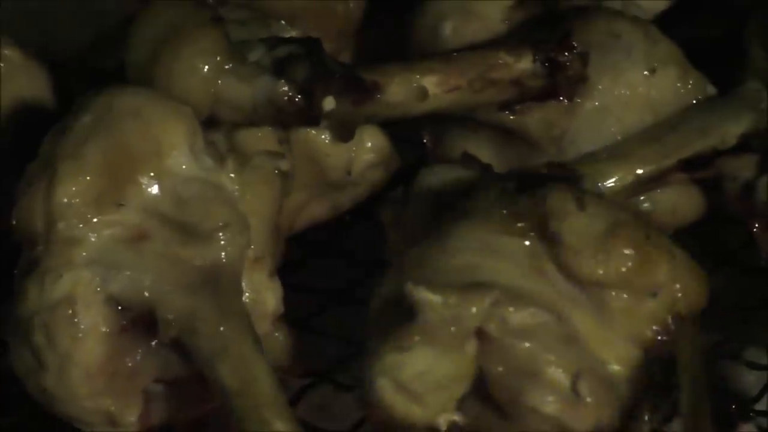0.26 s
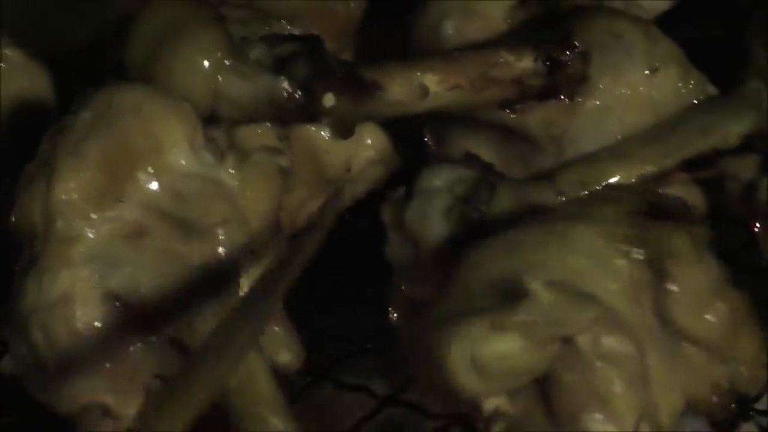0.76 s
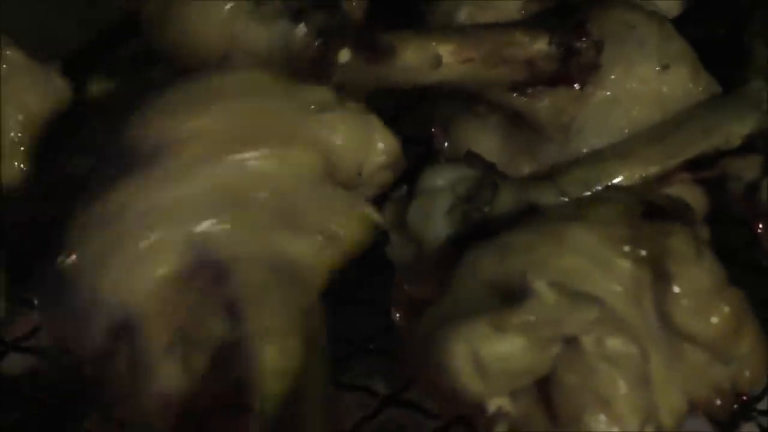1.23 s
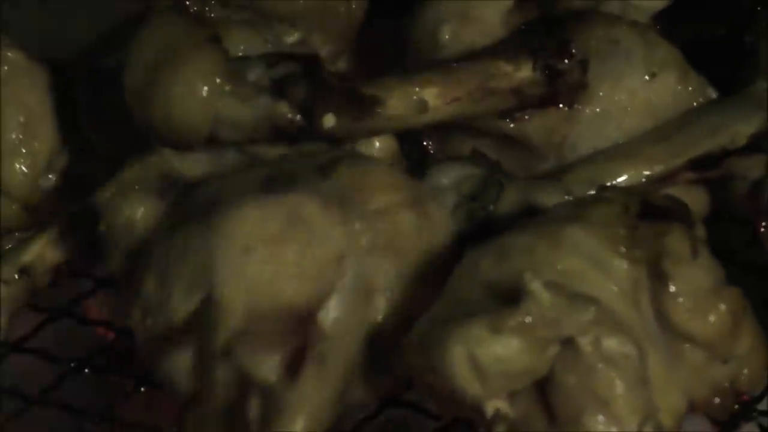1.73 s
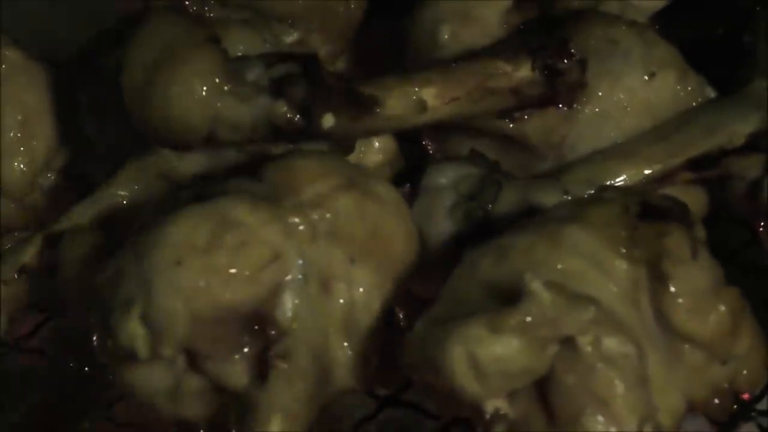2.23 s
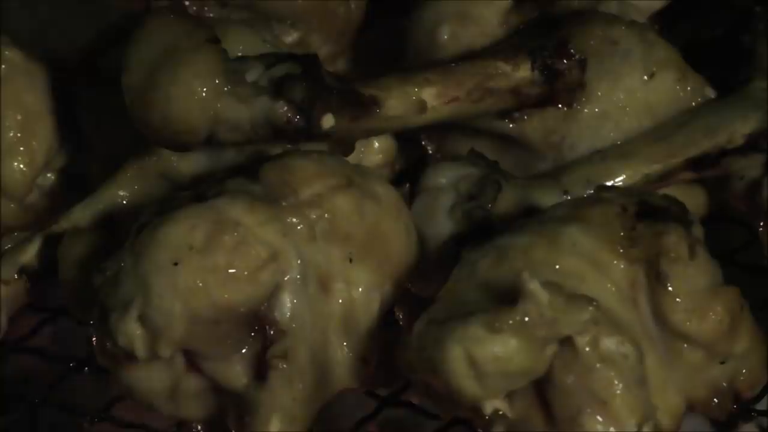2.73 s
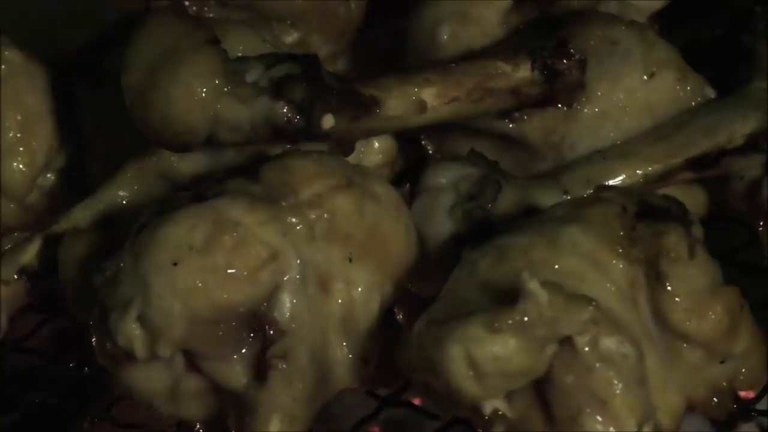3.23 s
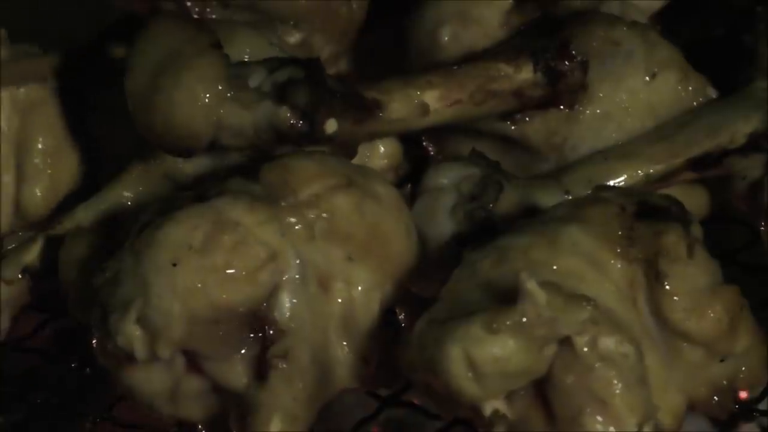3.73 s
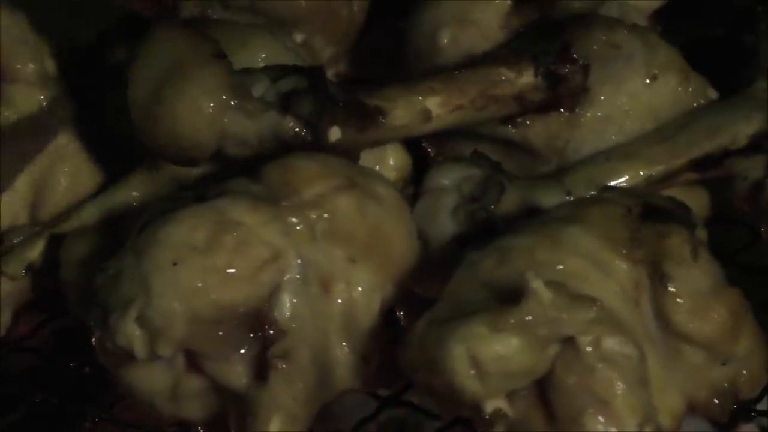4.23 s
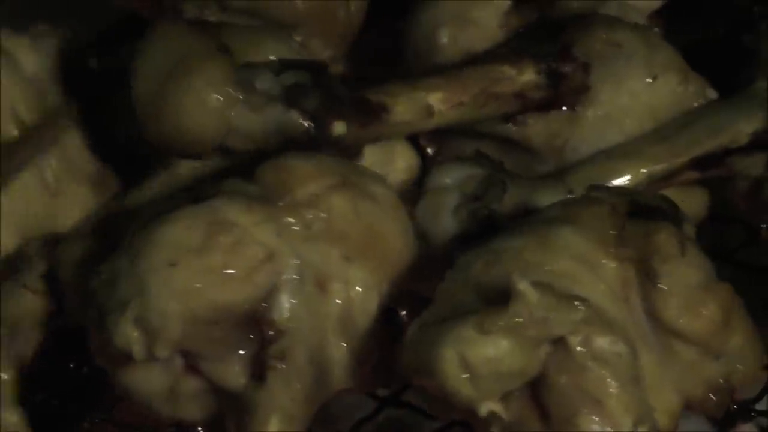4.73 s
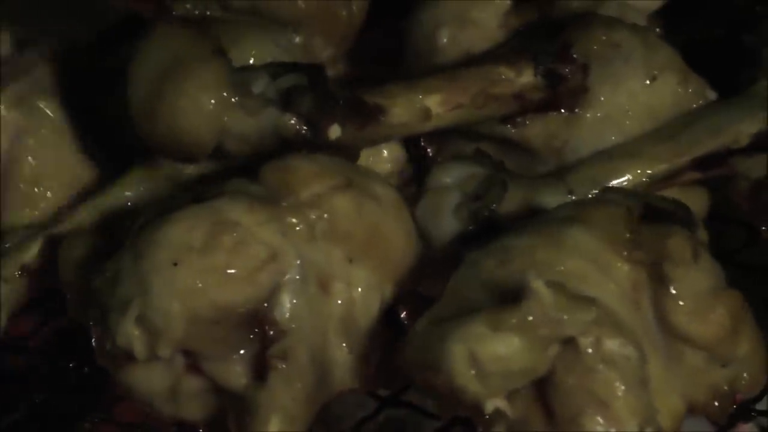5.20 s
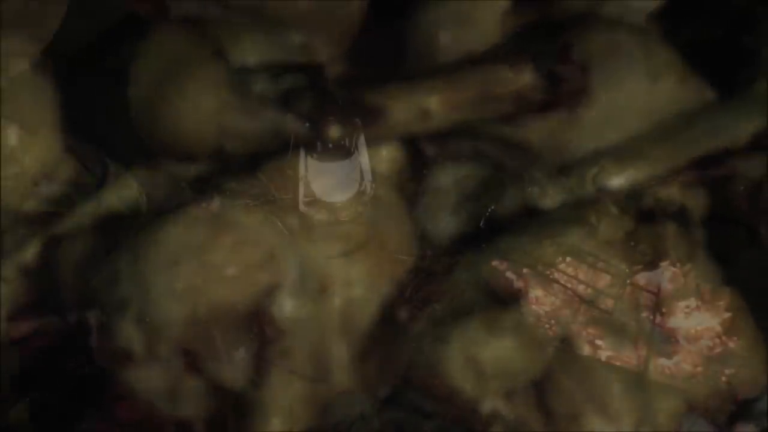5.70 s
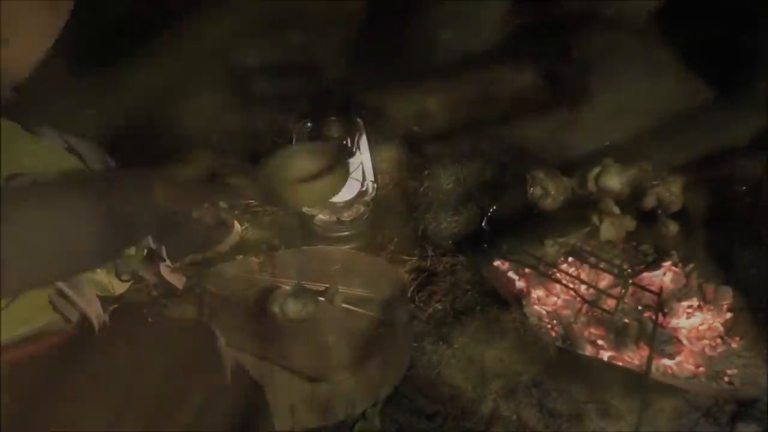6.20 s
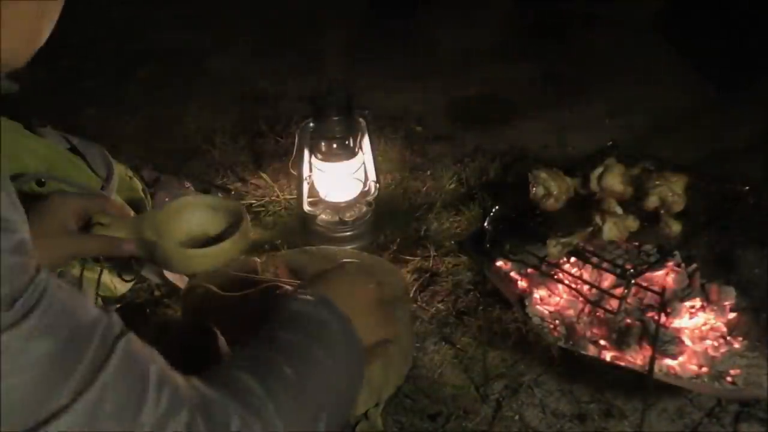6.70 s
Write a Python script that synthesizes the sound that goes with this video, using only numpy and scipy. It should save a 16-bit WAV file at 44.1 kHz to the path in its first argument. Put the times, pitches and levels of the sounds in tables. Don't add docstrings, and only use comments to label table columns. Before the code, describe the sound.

A close, nearly mono microphone hears chicken sizzling on a charcoal grate outdoors, a fine bright fizz over a very faint low draught, coloured by a short ground reflection. A loud crack at 0.4 s starts a spitting burst; from 0.55 to 1.05 s pops crowd together and a steam jet hisses strongly. The sizzle then runs smoothly until a crackly, fading spit at 2.2-2.6 s. Soft steam swells follow around 3-3.5 s, a hard snap at 3.8 s, then a quieter simmer. From 4.6 to 5.2 s fat spits busily, with strong cracks near 5.0 and 5.25 s. At 5.5 s the sound abruptly widens: louder low wind thumps the microphone while sizzling continues. A sharp spit comes at 5.8 s, a tiny falling high squeak of steam with faint grass-like rustle at 6.1-6.2 s, then swelling steam and bright scattered pops until 6.95 s.

```python
import sys
import numpy as np
from scipy import signal
from scipy.fft import rfft, irfft, next_fast_len
from scipy.io import wavfile
from scipy.ndimage import uniform_filter1d

SR = 44100
rng = np.random.default_rng(int(sys.argv[2]) if len(sys.argv) > 2 else 0)


def store_pcm(level_fs):
    pcm = np.round(np.clip(level_fs, -1, 1) * 32767).astype(np.int16)
    wavfile.write(sys.argv[1], SR, np.atleast_2d(pcm).T)


def amplitude_ratio(level_db):
    exponent = np.asarray(level_db, float) / 20
    return 10 ** exponent


N = 306476
T = np.arange(N) / SR
HZ = np.fft.rfftfreq(next_fast_len(N), 1 / SR)
CUT_S = 5.484
ECHO_S, ECHO_SHARE, ECHO_TOP_HZ = 0.002861, 0.54, 5100


def evened(x):
    return x / np.sqrt(np.mean(x ** 2) + 1e-20)


def read(points, hz):
    f, value = np.transpose(points)
    return np.interp(np.log(hz + 1), np.log(f + 1), value)


def add(mix, s, sound):
    part = mix[round(s * SR):][:len(sound)]
    part += sound[:len(part)]


def filtered(x, gain):
    size = next_fast_len(N)
    return irfft(rfft(x, size) * gain, size)[..., :N]


def closed(points):
    return amplitude_ratio(read(points, HZ)) * (HZ > points[0][0]) * (HZ < points[-1][0])


def ground(share):
    dullness = 1 + (HZ / ECHO_TOP_HZ) ** 2
    return 1 + share * np.exp(-2j * np.pi * HZ * ECHO_S) / dullness


def flicker(width_s):
    size = max(2, round(width_s * SR))
    smooth = uniform_filter1d(rng.standard_normal(N), size)
    return evened(uniform_filter1d(smooth, size))


def bubbles(per_s, spread_db):
    excess = np.minimum(rng.exponential(1, N), 3)
    size = amplitude_ratio(spread_db * excess) * rng.choice([-1., 1.], N)
    return size * (rng.random(N) < per_s / SR)


def resonate(x, hz, width):
    turn = np.exp(2j * np.pi * np.cumsum(hz * np.ones(len(x))) / SR)
    r = np.exp(-np.pi * width / SR)
    smooth = signal.lfilter([1], [1, -2 * r, r * r], x / turn)
    return evened((turn * smooth).real)


def patchy(x, patch_db, frames, bins):
    z = signal.stft(x, nperseg=512, noverlap=384)[2]
    field = rng.standard_normal(z.shape[-2:])
    field = uniform_filter1d(field, size=round(bins), axis=0)
    field = uniform_filter1d(field, size=round(frames), axis=1)
    return signal.istft(z * amplitude_ratio(patch_db * evened(field)), nperseg=512, noverlap=384)[1][..., :N]


# (frequency [Hz], correlation [0-1])
NEAR_LIKENESS = [(60, 0.97), (380, 0.98), (2380, 0.99), (15000, 1.0)]
WIDE_LIKENESS = [(60, 0.85), (180, 0.84), (550, 0.98), (1650, 0.95), (4970, 0.75), (15000, 0.93)]
# (frequency [Hz], left minus right [dB])
WIDE_BALANCE = [(60, 0.5), (380, 0.5), (2380, 2), (15000, -3)]


def spread(points, patchy_db, patch_s, near_echo=0.):
    a, b = rng.standard_normal((2, N))
    views = []
    near = (NEAR_LIKENESS, 0 * HZ, near_echo)
    wide = (WIDE_LIKENESS, read(WIDE_BALANCE, HZ), 0.24 * near_echo)
    for likeness, left_db, echo in (near, wide):
        c = np.clip(read(likeness, HZ), 0, 1)
        mid, side = np.sqrt((1 + c) / 2), np.sqrt((1 - c) / 2)
        colour = closed(points) * ground(echo) * amplitude_ratio(np.array([left_db, -left_db]) / 2)
        shared = filtered(a, colour * mid)
        opposed = filtered(b, colour * side) * [[1], [-1]]
        views.append(evened(shared + opposed))
    return np.where(T < CUT_S, *views) * amplitude_ratio(patchy_db * flicker(patch_s))


# (frequency [Hz], density [dB per Hz])
DRAUGHT_COLOUR = [(12, -39), (25, -19.5), (91, -2.5), (205, 2), (380, -8.5), (480, -9.5), (590, -16.5),
                  (760, -15.5), (900, -39)]
# (frequency [Hz], density [dB per Hz])
WIND_COLOUR = [(12, -47), (20, -12.5), (75, 1.5), (123, -0.5), (176, -10.5), (375, -9.5), (602, -20.5),
               (675, -14), (835, -22), (1000, -15.5), (1300, -19), (2200, -120)]
# (time [s], level [dB], frequency [Hz])
GUST_THUMPS = [
    (5.488, -32.5, 71.6),
    (5.535, -32, 77),
    (5.806, -30, 95),
]


def air(gain):
    near = spread(DRAUGHT_COLOUR, patchy_db=1.94, patch_s=0.058, near_echo=.5 * ECHO_SHARE)
    hollow_db = -11.5 - 0.9 * T + 2.8 * flicker(0.07)
    near += amplitude_ratio(hollow_db) * resonate(rng.standard_normal(N), hz=739, width=56)
    wind = spread(WIND_COLOUR, patchy_db=1.5, patch_s=0.025)
    thumps, t = np.zeros(N), np.arange(4000) / SR
    for s, db, hz in GUST_THUMPS:
        add(thumps, s, -np.sin(2 * np.pi * hz * t) * amplitude_ratio(db - 60 * t / 0.051))
    return gain * np.where(T < CUT_S, near, wind) + thumps


# (frequency [Hz], density [dB per Hz])
STEAM_COLOUR = [(600, -45), (900, -7), (1100, -1), (1400, 0.5), (2000, -2.5), (2600, -5.5), (3200, -13)]


def steam(gain):
    hiss = spread(STEAM_COLOUR, patchy_db=.8, patch_s=.03, near_echo=ECHO_SHARE)
    return gain * patchy(hiss, patch_db=1.27, frames=27, bins=4)


# (frequency [Hz], density [dB per Hz])
VENT_COLOUR = [(1290, -43), (2200, -8), (2630, -0.5), (3480, 1.5), (4750, -3.5), (5600, -3), (7280, -10.5),
               (12300, -120)]
# (time [s], level [dB], pocket resonance [Hz])
STEAM_JETS = [
    [(0.56, -45, 3290), (0.754, -43.5, 3308), (0.86, -55, 3298)],
    [(4.64, -64, 3482), (4.7, -55.5, 3493), (4.826, -59.5, 3460), (4.95, -63, 3540), (5.078, -58, 3540),
     (5.24, -72, 3460)],
]
# (time [s], level [dB], pocket resonance [Hz])
STEAM_PUFFS = [
    [(.1, -68, 1350), (.3, -61, 1430), (.55, -56, 1420)],
    [(2.84, -69, 1360), (2.95, -61, 1320), (3.08, -69, 1340)],
    [(6.2, -66, 1390), (6.45, -54.5, 1370), (6.85, -56, 1310)],
]
# (bandwidth [Hz], second resonance [ratio], its level [dB])
SKIN_POCKETS = [
    (900, 2.23, -4),
    (400, 1.74, 1),
    (246, 1.425, -1),
    (297, 0.89, -7),
    (348, 0.84, 1),
]


def vent(gain):
    seep = spread(VENT_COLOUR, patchy_db=1.8, patch_s=0.013, near_echo=ECHO_SHARE)
    out = gain * amplitude_ratio(1.2) * patchy(seep, patch_db=1.5, frames=50, bins=6)
    sputter = rng.standard_normal(N) + 1.8 * evened(bubbles(per_s=1100, spread_db=5.0))
    for rows, (width_hz, upper, upper_db) in zip(STEAM_JETS + STEAM_PUFFS, SKIN_POCKETS):
        s, db, hz = np.transpose(rows)
        on = slice(round(s[0] * SR), round(s[-1] * SR))
        hz = np.interp(T[on], s, hz)
        rings = resonate(sputter[on], hz, width_hz)
        rings = rings + amplitude_ratio(upper_db) * resonate(sputter[on], upper * hz, width_hz)
        out[:, on] += amplitude_ratio(np.interp(T[on], s, db)) * rings * signal.windows.tukey(len(hz), .1)
    return out


# (time [s], frequency [Hz], level [dB])
SLIT_WHISTLES = [
    [(6.097, 9101, -66), (6.105, 8885, -54), (6.113, 8660, -47), (6.118, 8400, -56)],
    [(6.114, 7950, -57), (6.123, 7960, -46), (6.139, 7900, -59), (6.165, 7800, -54), (6.185, 7420, -51)],
    [(6.214, 6500, -62), (6.222, 6600, -52), (6.232, 6500, -65)],
]


def squeak():
    out = np.zeros(N)
    for rows in SLIT_WHISTLES:
        s, hz, db = np.transpose(rows)
        t = np.arange(s[0], s[-1], 1 / SR)
        phase = 2 * np.pi * np.cumsum(np.interp(t, s, hz)) / SR
        tone = np.sin(phase) * amplitude_ratio(np.interp(t, s, db))
        add(out, s[0], np.sqrt(2) * tone * signal.windows.tukey(len(t), .3))
    return out


# (time [s], peak [dB], thud relative to crack [dB],
# length [ms], crack centre [Hz])
LARGE_BURSTS = [(0.3753, -14.5, -8.5, 0.68, 7360), (.378, -26, -13, 4.8, 9500), (.676, -19, -4.5, 1.7, 8800),
                (.724, -18.5, -19, 0.75, 11800), (0.7313, -29, -9, 1.6, 10000),
                (0.774, -23.5, -15, 0.46, 10800), (0.892, -27, -11, 1.3, 12300),
                (1.0095, -26.5, -6, 0.87, 12000), (1.0335, -22.5, -23, 3.1, 7500),
                (1.2416, -33, -14, .5, 10900), (2.2296, -26, -20, 1.7, 10200),
                (2.437, -28, -13.5, 0.93, 8400), (2.5553, -28.5, -18, .7, 8300),
                (2.653, -28.5, -19, 2.8, 8700), (3.084, -27, -24, 1.1, 10300), (3.789, -12.5, -16, 1, 9700),
                (3.798, -24, -24, 1.1, 9500), (4.183, -31, -16.5, 0.4, 9300), (4.471, -28, -21, 0.36, 10900),
                (4.911, -21.5, -22, 0.32, 8640), (4.997, -28, -8, 3.5, 10400),
                (5.018, -14.5, -27, .25, 11400), (5.2516, -13.5, -42, 1.12, 10200),
                (5.789, -16, -15, 0.2, 11000),
    (5.8161, -27.5, -11, 6, 10500),
    (6.1502, -18.5, -13.5, 0.34, 10200),
    (6.3935, -21.5, -16, 0.29, 10300),
    (6.5507, -23, -28, 2.1, 12200),
    (6.7158, -16.5, -10.5, 0.59, 12800),
    (6.7236, -28.5, -26, 2.8, 12100),
]
# (time [s], peak [dB])
SMALL_BURSTS = [(.242, -31.5), (.689, -21), (.84, -25), (0.9203, -25), (0.986, -26), (1.0267, -31),
                (1.8517, -32), (2.0702, -31.5), (2.2333, -25), (2.287, -27), (2.3354, -34), (2.3885, -27.5),
                (2.474, -26), (2.517, -32), (2.578, -29.5), (3.1518, -33.5), (3.23, -35), (3.2891, -32),
                (3.3601, -37), (3.8144, -27), (4.462, -36), (4.4801, -31), (4.6584, -27), (4.7043, -20.5),
                (4.7515, -23), (4.7817, -25), (4.819, -25), (4.9686, -34), (5.0362, -21), (5.111, -27.5),
                (5.139, -30), (5.2091, -33), (5.2745, -32), (5.3532, -34), (5.5332, -31),
                     (5.8041, -22), (5.8596, -31.5), (5.9513, -33), (5.973, -35), (6.0728, -29),
                     (6.2858, -30), (6.32, -26.5), (6.474, -22.5), (6.4936, -30), (6.5285, -26),
                     (6.5798, -28), (6.681, -30.5), (6.765, -30), (6.8008, -34), (6.8286, -24),
                     (6.8503, -26), (6.9266, -44)]


def pops():
    leak_s, leak_db = .003, -25.5
    left, right, t = np.zeros(N), np.zeros(N), np.arange(1500) / SR - leak_s
    ticks = SMALL_BURSTS
    rows = [(*row, -2.5) for row in LARGE_BURSTS]
    for (s, db), (u, v) in zip(ticks, rng.standard_normal((len(ticks), 2))):
        crack_hz = 10300 * np.exp(0.15 * np.clip(u, -2, 2))
        rows.append((s, db, -22.5, 0.48, crack_hz, 3.5 * v))
    noise = rng.standard_normal((len(rows), 4, 1500))
    low = signal.butter(4, [1800, 4100], "band", fs=SR)
    for (s, db, thud_db, ms, hz, pan_db), (a, b, c, d) in zip(rows, noise):
        high = signal.butter(2, [0.67 * hz, 1.494 * hz], "band", fs=SR)
        burst = np.exp(-(t / (max(ms, .2) / 1000)) ** 2 * 0.43) * (t >= 0)
        crack = signal.lfilter(*high, a * burst * amplitude_ratio(2.5 * d))
        spray_gain = amplitude_ratio(np.where(t < 0, leak_db, -19 - 60 * t / 0.046))
        spray = signal.lfilter(*high, b * amplitude_ratio(3.15 * d) * spray_gain)
        bright = crack / abs(crack).max() + spray
        thud_tail = amplitude_ratio(np.where(t < 0, leak_db, -19 - 60 * t / 0.018))
        thud = signal.lfilter(*low, c * (burst + thud_tail))
        sound = amplitude_ratio(db) * (bright / abs(bright).max() + amplitude_ratio(thud_db) * thud / abs(thud).max())
        pan_db = pan_db * (s > 6.05)
        add(left, s - leak_s - .0001, sound * amplitude_ratio(pan_db / 2))
        add(right, s - leak_s - .0001, sound * amplitude_ratio(-pan_db / 2))
    return filtered(np.array([left, right]), ground(0.17))


# (frequency [Hz], density [dB per Hz])
FIZZ_COLOUR = [(2650, -46), (4500, -9), (5850, -10.5), (7410, 0), (8190, -2), (10800, 4.5), (15100, -3),
               (15800, -2)]
# (frequency [Hz], density [dB per Hz])
SPIT_COLOUR = [(2820, -53), (4800, -14.5), (5330, -31), (5860, -3.5), (6770, -4), (7940, -3), (9090, -3),
               (11800, -4.5), (15800, -8.5)]


def fizz(gain, share):
    hiss = evened(filtered(rng.standard_normal(N), closed(FIZZ_COLOUR))) * amplitude_ratio(1.0 * flicker(0.005))
    hiss = patchy(hiss, patch_db=1.75, frames=50, bins=12)
    spit_colour = closed(SPIT_COLOUR)
    spit = evened(filtered(rng.standard_normal(N), spit_colour)) * amplitude_ratio(0.89 * flicker(0.0043))
    grains = np.zeros(N)
    for hz in np.geomspace(7000, 14000, num=4):
        band = np.exp(-(np.log((HZ + 1) / hz) / 0.95) ** 2)
        grains += evened(filtered(bubbles(per_s=200, spread_db=13.0), spit_colour * band)) / 2
    clicks = .65 * spit + .8 * grains
    return gain * (np.sqrt(1 - share) * hiss + np.sqrt(share) * clicks)


def curve(rows):
    return amplitude_ratio(2 * np.interp(T, *np.transpose(rows)))


# (middle [s], half length [s], level [dB], vent relative to it [dB])
STEAM_SWELLS = [(0.112, 0.14, -60, -18), (0.387, .14, -58.5, -3), (0.603, 0.049, -50, -14),
                (0.697, .05, -50.5, -12), (0.767, 0.033, -52, -8), (0.894, 0.082, -61.5, 0),
                (1.053, 0.11, -65.5, 4), (1.498, 0.29, -86, 15), (1.882, 0.11, -59.5, -1.5),
                (2.043, 0.11, -59.5, -11), (2.4, 0.32, -68, -2), (2.94, .1, -60, -8.5),
                (3.362, 0.07, -56, -5), (3.477, 0.16, -62.5, -0.5), (3.736, 0.069, -60, -7.5),
                (3.997, 0.19, -65.5, -4), (4.492, 0.082, -68, -4.5), (4.75, 0.075, -61, -7),
                (4.997, 0.074, -72, 0), (5.208, 0.078, -74, 6), (5.738, 0.082, -55.5, -11),
                (6.282, .08, -48.5, -23), (6.436, .12, -44.5, -13), (6.673, 0.11, -48.5, -11.5)]


def swelling():
    out = np.zeros((2, N))
    for s, half, db, vent_db in STEAM_SWELLS:
        out += amplitude_ratio(2 * db) * np.exp(-((T - s) / half) ** 2) * amplitude_ratio([[0], [2 * vent_db]])
    return out


# (start [s], length [s], level [dB], change over burst [dB], vent relative to it [dB])
FAT_SPITS = [
    (0.368, 0.17, -48, -4.5, -5),
    (0.558, 0.23, -47, 4.5, -5),
    (0.844, .21, -48, -2.5, -7),
    (2.237, 0.36, -50, -10.5, -6),
    (4.64, .025, -41, -6, -21),
    (4.637, 0.58, -45.5, -2, -20),
    (5.781, 0.064, -39.5, -13, -15),
    (6.28, 0.38, -55, -1, -8),
    (6.404, 0.091, -49.5, -3, -6),
]


def spitting():
    out = np.zeros((2, N))
    for start, length, db, sag_db, vent_db in FAT_SPITS:
        t = np.maximum(T - start, 0)
        shape_db = 0.5 * np.exp(-t / 0.027) + sag_db * np.minimum(t / length, 1)
        shape_db -= 250 * np.maximum(t - length, 0)
        rise = np.minimum(t / 0.0029, 1)
        out += rise * amplitude_ratio(2 * (db + shape_db)) * amplitude_ratio([[0], [2 * vent_db]])
    return out


# (time [s], level [dB])
DRAUGHT_LEVEL = [(0, -69), (.45, -64.5), (1.5, -62), (2.25, -65), (3.2, -62.5), (3.78, -66), (3.86, -72.5),
                 (4.6, -69.5), (5.15, -63.5), (5.27, -71.5), (5.47, -77.5)]
# (time [s], level [dB])
WIND_LEVEL = [(5.484, -44), (5.6, -51.5), (5.77, -47), (5.97, -49), (6.05, -52), (6.32, -45), (6.58, -48),
              (6.71, -46.5), (6.95, -51)]
# (time [s], level [dB])
SIMMER_LEVEL = [(0, -58.5), (.24, -55), (1.13, -54.5), (1.45, -54), (1.69, -56.5), (2.2, -56.5),
                (2.72, -54.5), (3.2, -53.5), (3.66, -54.5), (3.85, -58), (4.2, -61.5), (4.36, -60),
                (4.51, -59), (4.62, -62), (5.28, -57.5), (5.43, -55.5), (5.7, -53.5), (6.95, -53.5)]


def levels():
    near, simmer, draught = T < CUT_S, curve(SIMMER_LEVEL), curve(DRAUGHT_LEVEL)
    (spit, spit_vent), (swell, swell_vent) = spitting(), swelling()
    fat = simmer + spit + near * swell * amplitude_ratio(2 * -3.5)
    seep = simmer * amplitude_ratio(2 * np.where(near, -15.5, -4.5)) + spit_vent + swell_vent
    mist = np.where(near, draught * amplitude_ratio(2 * -6), amplitude_ratio(2 * -54)) + swell
    lifted = draught + np.minimum(swell * amplitude_ratio(2 * -4), draught)
    flow = np.where(near, lifted, curve(WIND_LEVEL))
    calm, busy = 0.2, 0.51
    muffled = fat + swell * amplitude_ratio(2 * 13)
    share = np.clip(calm + (busy - calm) * spit / muffled, 0, 1)
    return *np.sqrt([fat, seep, mist, flow]), share


def scene():
    fat, seep, mist, flow, share = levels()
    return air(flow) + steam(mist) + vent(seep) + squeak() + pops() + fizz(fat, share)


def roll_off(x):
    return signal.sosfilt(signal.butter(12, 16990, fs=SR, output="sos"), x)


def record(dry):
    edge_hz, top_hz = 15850, 16800
    strong = uniform_filter1d(abs(dry[0]), size=20) > amplitude_ratio(-26)
    loud = uniform_filter1d(1. * strong, size=60) > 0
    top = filtered(dry, HZ > edge_hz) * uniform_filter1d(1. * loud, size=120)
    top = amplitude_ratio(-13) * filtered(top, (HZ > edge_hz) * (HZ < top_hz))
    mix = filtered(dry, HZ < edge_hz) + top
    return roll_off(mix)


dry = scene()
out = record(dry)
store_pcm(out)
```